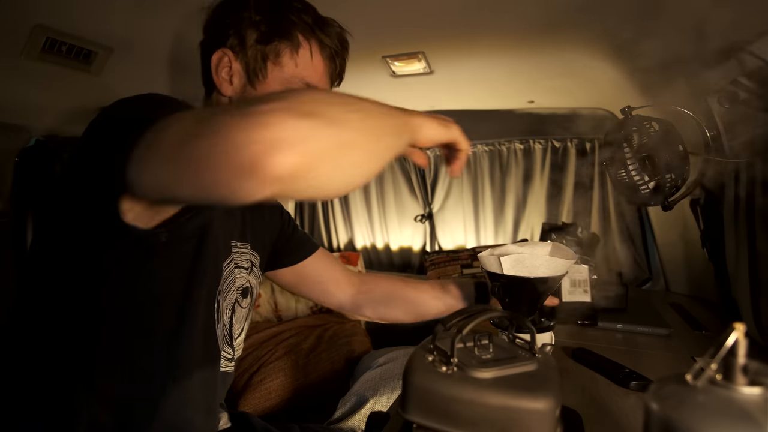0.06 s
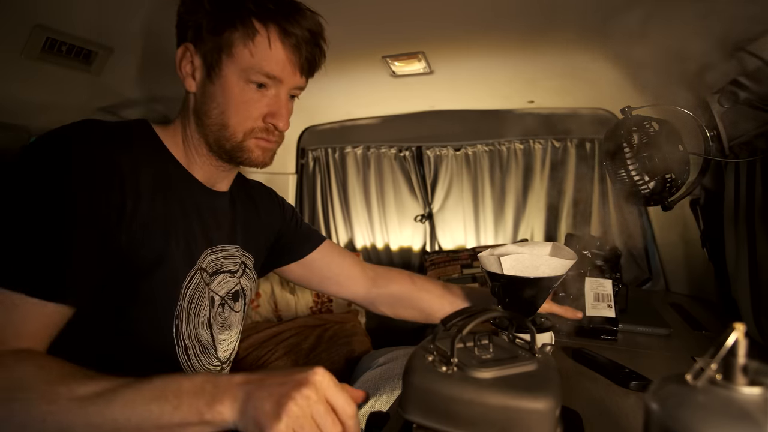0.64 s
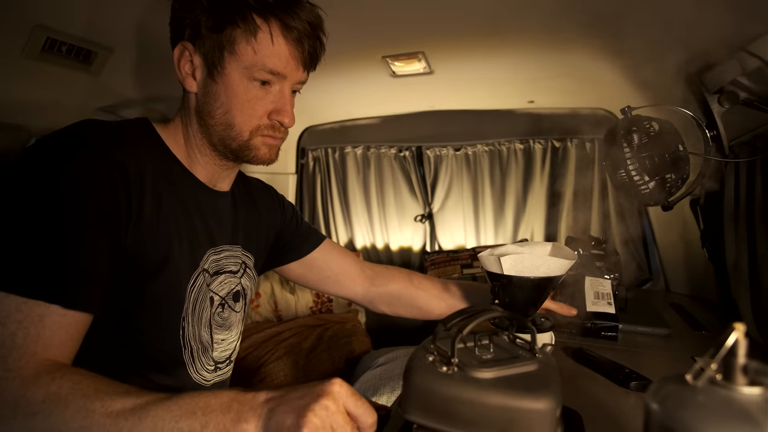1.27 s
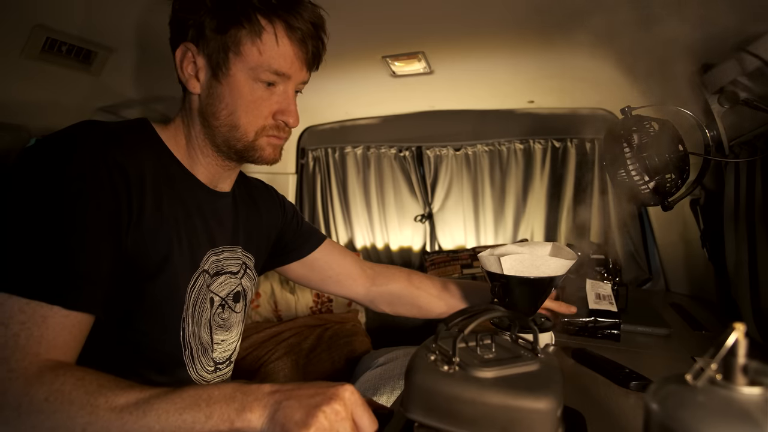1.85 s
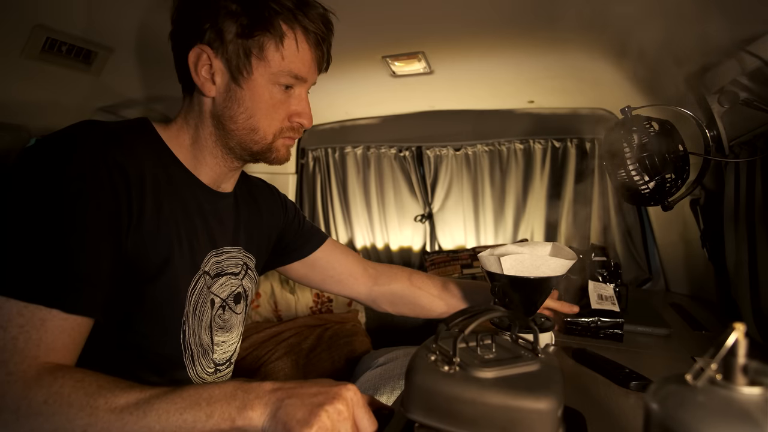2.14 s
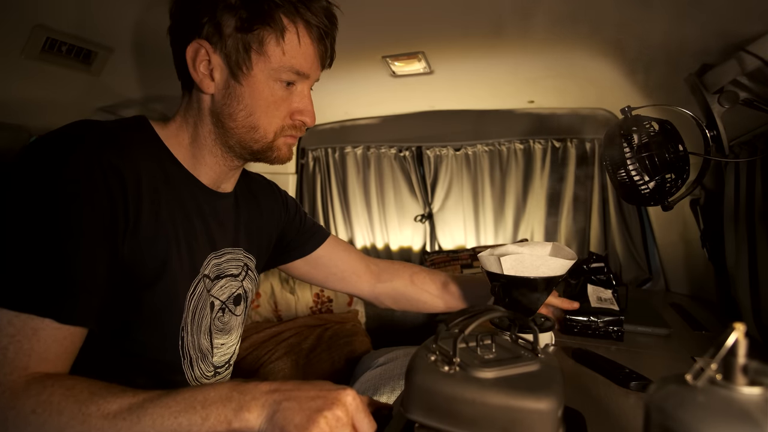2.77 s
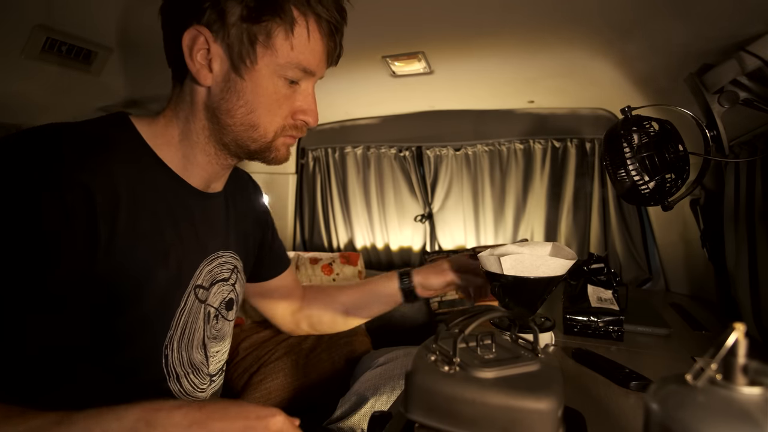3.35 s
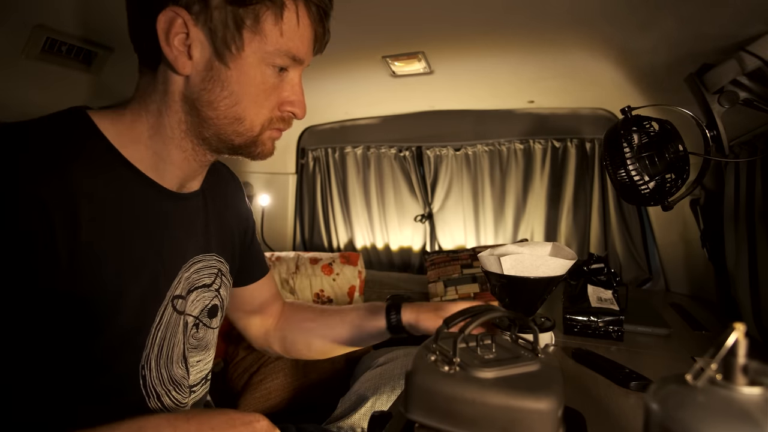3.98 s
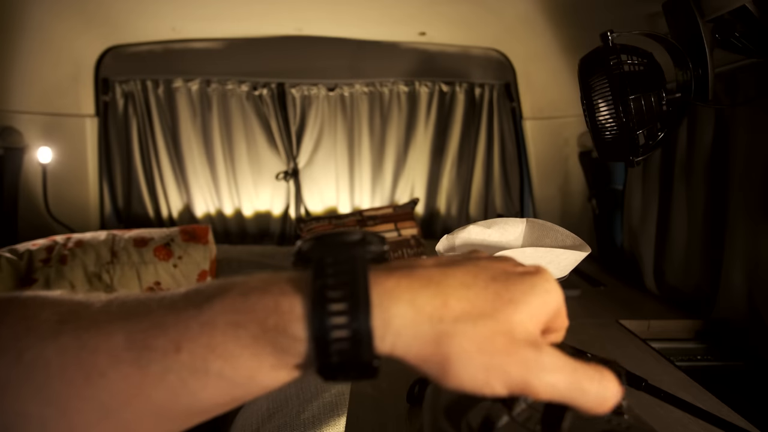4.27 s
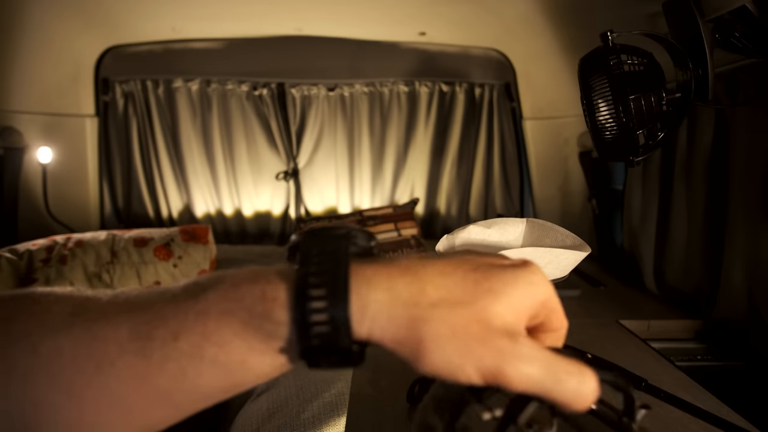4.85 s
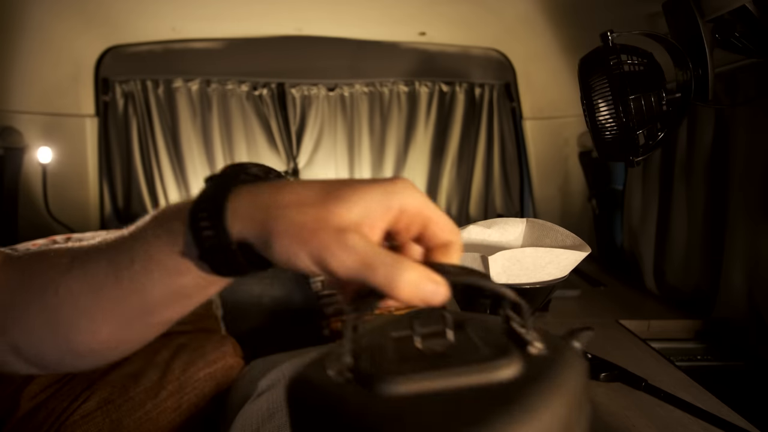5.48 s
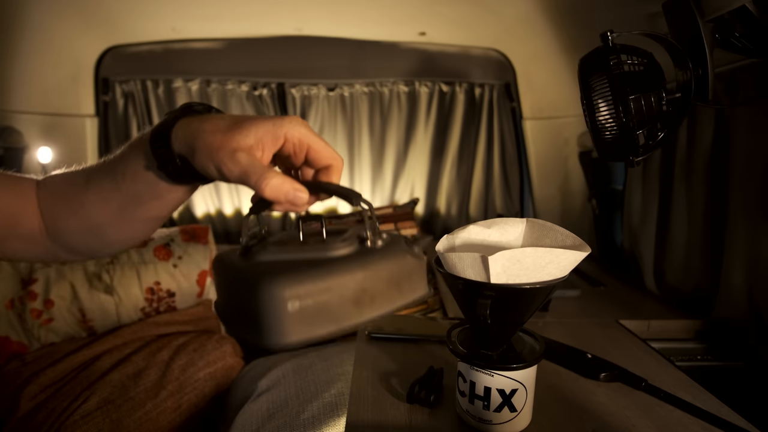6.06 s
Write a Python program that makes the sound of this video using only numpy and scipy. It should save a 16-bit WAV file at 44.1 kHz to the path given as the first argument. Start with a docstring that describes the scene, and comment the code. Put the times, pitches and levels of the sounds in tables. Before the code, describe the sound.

A small gas stove roars and fades, water spits on the hot kettle, and the kettle is dragged off with metallic scrapes.

```python
"""Kettle on a van's gas stove

Inside a quiet, padded van, one microphone close to the stove. The burner roars and is turned down.
Water on the hot kettle goes on spitting at two spots, each with a beat that slows as the metal cools.
A hand knocks the handle, drags the kettle off the pan support in four scrapes and lifts it.
Thin whistles, like a far bird, glide in faintly from outside."""
import sys
import numpy as np
from scipy import signal
from scipy.fft import rfft, irfft
from scipy.io import wavfile
from scipy.ndimage import uniform_filter1d

SR = 44100
rng = np.random.default_rng(int(sys.argv[2]) if len(sys.argv) > 2 else 0)


def generate_wav(signal):
    """Clip the signal to [-1, 1] and save it as 16-bit WAV at the path in sys.argv[1]."""
    frames = np.transpose(np.atleast_2d(signal))
    scaled = np.clip(frames, -1, 1) * 32767
    pcm = np.round(scaled).astype(np.int16)
    wavfile.write(sys.argv[1], SR, pcm)


N = 269892
HZ = np.fft.rfftfreq(N, 1 / SR)
TIME = np.arange(N) / SR

# room tone of the cabin: (frequency [Hz], relative level [dB])
AIR_COLOUR = [(15, -32), (25, 0.5), (59, 0), (149, -7), (363, -14), (416, -14), (796, -13), (1130, -15.5),
              (5280, -26.5), (8140, -39), (14800, -38.5), (16000, -38)]
# its loudness: (time [s], level [dB])
AIR_LEVEL = [(0, -63.5), (4.9, -56.5), (5.3, -63), (5.5, -63), (5.75, -59), (6.12, -58)]
# far whistles: (time [s], length [s], start [Hz], middle [Hz], end [Hz], level [dB])
WHISTLE_NOTES = [(0.481, 0.034, 3530, 3270, 3050, -43), (0.638, 0.11, 2500, 2780, 3390, -46),
                 (0.772, 0.069, 3340, 3170, 2480, -45), (1.789, 0.24, 6900, 7030, 7000, -63),
                 (3.05, 0.029, 3460, 3210, 3200, -47), (3.413, 0.065, 4750, 5320, 5600, -59),
                 (3.581, .04, 3260, 3000, 2800, -52), (3.779, 0.062, 5100, 4770, 4000, -57.5),
                 (4.048, 0.12, 6630, 6670, 6780, -58), (4.464, 0.073, 5500, 4900, 5470, -56),
                 (4.993, 0.13, 3810, 3980, 4350, -59.5), (5.276, 0.097, 5480, 5900, 5650, -62.5),
                 (5.49, 0.093, 5480, 4950, 4650, -65), (5.678, 0.13, 2200, 3310, 2390, -56.5),
                 (5.9, 0.096, 3100, 2605, 2210, -62.5), (6.065, 0.059, 3300, 3150, 2580, -51.5)]
# the burner being turned down: (time [s], roar [dB], jet hiss [dB], flame rumble [dB])
BURNER_LEVELS = [(0, -40, -45.5, -46), (.3, -42, -47, -47), (1.25, -42.5, -48.5, -46),
                 (1.45, -43, -47.5, -53.5), (1.6, -47, -52, -57.5), (1.85, -54.5, -63.5, -67),
                 (2.25, -79, -71, -90)]
# the burning gas: (frequency [Hz], relative level [dB])
FLAME_COLOUR = [(15, -35), (25, 1.5), (149, 7), (354, -0.5), (439, -16), (677, -6), (988, -18.5),
                (1160, -31.5), (1480, -14), (2110, -15.5), (2480, -16.5), (3080, -16.5), (3720, -35),
                (9070, -41.5), (16000, -57.5)]
# resonances of the gap under the kettle: (frequency [Hz], width [Hz], relative level [dB])
GAP_MODES = [(676, 12, 5), (906, 60, -3), (1160, 180, 3), (1665, 82, -14.5), (2068, 120, -3),
             (2945, 120, -3)]
# water on hot metal: (frequency [Hz], relative level [dB])
SIZZLE_COLOUR = [(240, -33.5), (400, -5.5), (742, -20), (814, -30), (1160, -4), (1290, -10.5), (1960, -5.5),
                 (2400, -9.5), (2750, -8), (9610, -12.5), (10400, -23.5), (12500, -13), (16000, -23.5)]
# the kettle's shell: (frequency [Hz], width [Hz], relative level [dB])
SHELL_MODES = [(590, 22, -1), (745, 30, -8), (1168, 34, 0), (1900, 70, -4), (2050, 70, -6), (2710, 90, -2),
               (2995, 70, -3), (3742, 40, -3), (4100, 42, -2), (4810, 55, -5), (5630, 50, -7),
               (7450, 200, -9), (8700, 100, -8), (9830, 150, -10), (12200, 90, -13), (12900, 300, -13)]
# beat of the full spits at the first spot: (time [s], rate [1/s])
FULL_SPIT_RATE = [(1.83, 23.35), (2.158, 21.66), (2.983, 12.39), (3.148, 12.07), (3.421, 9.71),
                  (3.841, 8.27), (4.2, 6.03)]
# beat of the thin spits at the second: (time [s], rate [1/s])
THIN_SPIT_RATE = [(2.545, 29.66), (3.079, 19.45), (3.774, 13.06), (4.17, 10.76)]
# how hard the kettle sputters: (time [s], fizz [dB], body [dB])
SPIT_LEVELS = [(1.8, -72, -55.5), (2.15, -46.5, -47), (2.4, -43.5, -43.5), (2.95, -41, -39.5),
               (3.6, -43, -39.5), (4.16, -45.5, -44)]
# dull bumps through the counter: (time [s], level [dB], nominal pitch [Hz], t60 [s])
COUNTER_BUMPS = [(0.02, -20, 187, 0.025), (0.452, -18.5, 233, 0.045), (0.468, -24.5, 73, 0.17),
                 (2.606, -42, 260, 0.035), (2.881, -48, 275, 0.15), (3.023, -26, 228, 0.027),
                 (3.721, -49.5, 64.9, 0.74), (4.071, -39.5, 81, 0.39), (4.969, -38, 58.5, 0.33)]
# knocks on handle and stove: (time [s], level [dB], treble [dB], t60 [s], ring against level [dB])
METAL_KNOCKS = [(0.022,-24.5,-56,0.023,-11), (0.411,-18,-30.5,0.024,-28), (0.453,-29.5,-34.5,0.045,-12),
                (0.699,-26,-47,0.033,-39), (1.311,-39.5,-60,0.023,-4), (2.611,-40.5,-56,0.031,-24),
                (3.023,-38,-41,0.025,-16), (3.619,-46.5,-75,0.14,3), (3.768,-30,-61,0.094,-3.5),
                (4.067,-23,-47,0.1,-4), (4.2955,-4,-20.5,0.027,-26), (4.381,-8,-27,0.07,-14),
                (4.653,-33,-53,0.17,7), (4.799,-28,-41,0.019,-12), (5.633,-41.5,-55.5,0.088,-19)]
# metal striking metal: (frequency [Hz], relative level [dB])
KNOCK_COLOUR = [(120, -43.5), (200, -12.5), (366, -6), (659, -7.5), (1500, 3.5), (2170, -3), (2420, -3),
                (3690, -12.5), (5230, -19), (6760, -23), (10500, -35.5), (14600, -47.5), (16000, -42)]
# ring of handle and lid: (frequency [Hz], relative level [dB], t60 [s])
HANDLE_MODES = [(700, 13.5, 0.071), (970, 2.5, 0.2), (1006, -9, 0.13), (1500, -6, 0.05), (1552, -3, 0.14),
                (2080, -26, 0.2), (2905, -9, 0.21), (2980, -25, 0.11), (3820, -36.5, 0.34)]
# the kettle sliding on the pan support: (frequency [Hz], relative level [dB])
GRIND_COLOUR = [(18, -46), (30, -9), (95, 1), (174, -31), (227, 1), (273, -15.5), (499, -11), (600, 9.5),
                (988, -2), (1460, 1), (3060, -15), (3310, -21), (3580, -33), (5590, -26), (16000, -49.5)]
# kettle and support ringing together: (frequency [Hz], width [Hz], relative level [dB])
SUPPORT_MODES = [(60, 19, -6.5), (90.3, 12, 0.5), (238.6, 4, -3.5), (632.8, 3.3, 13), (692, 17, 1),
                 (710, 10, 3), (792, 4.1, 1), (1142, 24, -3), (1260, 11, 2.5), (1475, 18, -5),
                 (1505, 20, 6.5), (1610, 43, -4), (1820, 16, -5), (1891, 77, 1), (2244, 95, -4),
                 (2750, 37, -5.5), (3070, 31, -12.5), (3674, 75, -20.5), (12000, 250, -38),
                 (13900, 250, -43.5)]
# the four scrapes: (time [s], hold [s], grind [dB], grit [dB], counter shake [dB], grind release [dB/s])
SCRAPE_STROKES = [(4.3, 0.11, -14.5, -35, -26.5, 234.5), (4.553, 0.054, -17.5, -40.5, -29, 613),
                  (4.698, 0.12, -25, -49, -35, 520), (4.886, 0.078, -22, -44.5, -43, 428)]

FLAME_DOWN_S, SIMMER_DB, SIMMER_DROP_DB, SIMMER_DROP_S, COOLING_DB_PER_S = 1.47, -51.5, 7.5, 0.33, 3
SPIT_RISE_S, FIZZ_S, BODY_S, SPIT_SCATTER_DB = 0.0035, 0.0077, 0.015, 1.3
REBOUND_S, REBOUND_DB = .021, -4.5  # a large drop touches the metal again
SHELL_HZ, SHELL_T60_S = 1170, .16
SHELL_RING_DB, THIN_BODY_DB = -11, -14  # against the body of a full spit
GRAB_DB_PER_S, SAG_DB_PER_S, JUDDER_DB, RASP_DB = 901.5, 30.5, 1.3, -20.5
SQUEAL_HZ, SQUEAL_DB = 5570, -50.5


def amp(db):
    """Decibels to gain."""
    return 10 ** (np.asarray(db) / 20)


def unit(x):
    """Scales to rms 1."""
    return x / np.sqrt(np.mean(x ** 2) + 1e-20)


def add(mix, s, sound):
    """Mixes a sound in at time s."""
    start = round(s * SR)
    sound = sound[max(-start, 0):]
    part = mix[max(start, 0):][:len(sound)]
    part += sound[:len(part)]


def noise(size=N):
    """White noise."""
    return rng.standard_normal(size)


def flicker(depth_db, per_s):
    """A gain that wavers at random."""
    return amp(depth_db * unit(uniform_filter1d(noise(), SR // per_s)))


def grains(per_s, spread_db):
    """Random tiny impacts, uneven in size."""
    impacts = noise() * (rng.random(N) < per_s / SR)
    return unit(impacts * amp(spread_db * np.minimum(rng.exponential(1, N), 4)))


def mode(t, hz, db, t60):
    """One dying resonance at a random phase."""
    return amp(db - 60 * t / t60) * np.sin(2 * np.pi * (hz * t + rng.random()))


def tone(hz, width_hz):
    """A fuzzy tone that follows the curve hz."""
    lowpass = signal.butter(2, width_hz / 2, fs=SR, output="sos")
    blur = signal.sosfilt(lowpass, noise(len(hz)) + 1j * noise(len(hz)))
    return unit((blur * np.exp(2j * np.pi * np.cumsum(hz) / SR)).real)


def response(colour, peaks=(), peaks_db=0):
    """Gain over frequency: a smooth slope with resonances standing on it."""
    hz, db = np.transpose(colour)
    power = amp(np.interp(np.log(HZ + 1), np.log(hz), db)) ** 2
    for centre, width, peak_db in peaks:
        power += amp(peak_db + peaks_db) ** 2 / (1 + (2 * (HZ - centre) / width) ** 2) ** 1.5
    return np.sqrt(power)


def band(x, gain, lo_hz, hi_hz):
    """One band of x at rms 1, coloured by a body that rings only after it is driven (minimum phase)."""
    edges = (1 + (lo_hz / (HZ + 1)) ** 12) * (1 + (HZ / hi_hz) ** 12)
    cepstrum = irfft(np.log(gain / np.sqrt(edges) + 1e-5), N)
    causal_filter = np.exp(rfft(2 * cepstrum[:N // 2], N))
    return unit(irfft(rfft(x) * causal_filter, N))


def level(s, db):
    """A level curve as gain, silent outside its span."""
    return amp(np.interp(TIME, s, db)) * (TIME >= s[0]) * (TIME < s[-1])


def van_echo(x, wet_db, t60):
    """Padded walls close around the microphone: a dense, very short echo above the bass."""
    t = TIME[:SR // 4]
    tail = noise(len(t)) * amp(-60 * t / t60) * (t > .002)
    tail = signal.sosfilt(signal.butter(2, 900, "high", fs=SR, output="sos"), tail)
    echo = signal.oaconvolve(x, tail / np.linalg.norm(tail))[:N]
    return (x + amp(wet_db) * echo) / np.sqrt(1 + amp(wet_db) ** 2)


def cabin_air():
    """Room tone: the low hush of still air in the van."""
    return band(noise(), response(AIR_COLOUR), 18, 17000) * level(*np.transpose(AIR_LEVEL))


def whistles():
    """Far off: thin gliding notes, blurred by their way in from outside."""
    out = np.zeros(N)
    for s, length, start_hz, middle_hz, end_hz, db in WHISTLE_NOTES:
        glide = np.polyfit([0, .5, 1], [start_hz, middle_hz, end_hz], 2)
        hz = np.polyval(glide, np.linspace(0, 1, int(length * SR)))
        note = tone(hz, width_hz=330 * (3000 / middle_hz) ** 1.5)  # higher notes are purer
        add(out, s, amp(db) * note * signal.windows.tukey(len(hz), .6))
    return van_echo(out, wet_db=-5, t60=.2)


def burner():
    """Turbulent flame rumble, roar under the kettle and jet hiss, all dying as the valve closes."""
    s, roar_db, jet_db, rumble_db = np.transpose(BURNER_LEVELS)
    colour = response(FLAME_COLOUR, GAP_MODES, peaks_db=-6)
    flutter = flicker(0.45, per_s=50)
    rumble = band(noise(), colour, 27, 310) * level(s, rumble_db)
    roar = band(noise(), colour, 386, 2730) * level(s, roar_db)
    jet = band(noise(), colour, 4330, SR / 2) * level(s, jet_db)
    # the shell sings as the flame drops
    sing = tone(np.full(N, 1168), width_hz=66) * level([1.2, 1.4, 1.52], [-58, -43, -58])
    return van_echo(rumble + flutter * (roar + jet), wet_db=-8, t60=0.062) + sing


def simmer():
    """Countless tiny spits merge into a sizzle that drops with the flame and fades as the kettle cools."""
    colour = response(SIZZLE_COLOUR, SHELL_MODES, peaks_db=-0.5)
    fizz = band(grains(per_s=9000, spread_db=2), colour, 1800, SR / 2)
    restless = unit(flicker(4, per_s=80))
    cooling_s = np.maximum(TIME - FLAME_DOWN_S, 0)
    drop_db = SIMMER_DROP_DB * np.minimum(cooling_s / SIMMER_DROP_S, 1)
    return fizz * restless * amp(SIMMER_DB - drop_db - COOLING_DB_PER_S * cooling_s)


def spit_beats(rate):
    """One spit for each turn of a spot's beat: (time [s], fizz [dB], body [dB])."""
    turns = np.cumsum(np.interp(TIME, *np.transpose(rate), left=0, right=0)) / SR
    times = TIME[1:][np.diff(np.round(turns)) > 0]
    s, fizz_db, body_db = np.transpose(SPIT_LEVELS)
    chance_db = SPIT_SCATTER_DB * noise(100)[:len(times)]
    return zip(times, np.interp(times, s, fizz_db) + chance_db, np.interp(times, s, body_db) + chance_db)


def spits():
    """Water flashes to steam: a sharp fizz and a slower body. Full spits rebound and ring the shell."""
    t = TIME[:SR // 8]
    fizz_power, body_power, ring = np.zeros((3, N))
    rise = 1 - np.exp(-t / SPIT_RISE_S)
    burst = rise * np.exp(-(t / FIZZ_S) ** 2)
    puff = rise ** 2 * np.exp(-(t / BODY_S) ** 2)
    for s, fizz_db, body_db in spit_beats(FULL_SPIT_RATE):
        add(fizz_power, s, (amp(fizz_db) * burst) ** 2)
        add(fizz_power, s + REBOUND_S, (amp(fizz_db + REBOUND_DB) * burst) ** 2)
        add(body_power, s, (amp(body_db) * puff) ** 2)
        add(ring, s, rise ** 2 * mode(t, SHELL_HZ, body_db + SHELL_RING_DB, SHELL_T60_S))
    for s, fizz_db, body_db in spit_beats(THIN_SPIT_RATE):
        add(fizz_power, s, (amp(fizz_db) * burst) ** 2)
        add(body_power, s, (amp(body_db + THIN_BODY_DB) * puff) ** 2)
    crackle = grains(per_s=27000, spread_db=2.6)
    body_colour = response(SIZZLE_COLOUR, SHELL_MODES, peaks_db=5.5)
    fizz_colour = response(SIZZLE_COLOUR, SHELL_MODES, peaks_db=4.5)
    body = band(crackle * np.sqrt(body_power), body_colour, 450, 4400) * np.sqrt(body_power.mean())
    fizz = band(crackle * np.sqrt(fizz_power), fizz_colour, 4660, SR / 2) * np.sqrt(fizz_power.mean())
    return van_echo(body + fizz, wet_db=-5, t60=0.11) + ring


def metal_rings():
    """A light touch rings the shell's lowest modes; the pan support rings on once the kettle leaves it."""
    t, out = TIME[:SR // 2], np.zeros(N)
    shell = sum(amp(db) * np.exp(-np.pi * width / 2 * t) * np.sin(2 * np.pi * hz * t)
                for hz, width, db in SHELL_MODES[:3])
    support = amp(-60 * t / .42) * np.sin(2 * np.pi * 900 * t)
    add(out, 2.875, amp(-39) * shell)
    add(out, 4.97, amp(-47) * support)
    return out


def bumps():
    """Soft blows shake the counter: a few damped low modes, scattered around each bump's pitch."""
    t, out = TIME[:SR // 2], np.zeros(N)
    attack = 1 - np.exp(-t / 0.0062)
    for s, db, hz, t60 in COUNTER_BUMPS:
        modes = sum(gain * np.sin(2 * np.pi * hz * ratio * rng.uniform(0.73, 1.3) * t)
                    for ratio, gain in [(.65, 0.94), (1, 0.8), (1.45, 0.95), (2.1, 0.55)])
        add(out, s, amp(db - 60 * t / t60) * modes * attack)
    return out


def knocks():
    """Close by: a brief clatter of metal contacts, followed by the ring of handle and lid."""
    t, out = TIME[:SR // 3], np.zeros(N)
    colour = response(KNOCK_COLOUR)
    clack = band(noise(), colour, 330, 4200)
    tick = band(noise(), colour, 5000, SR / 2)
    attack, onset = 1 - np.exp(-t / 0.00062), slice(SR // 100)
    for k, (s, db, treble_db, t60, ring_db) in enumerate(METAL_KNOCKS):
        part = slice(k * len(t), (k + 1) * len(t))  # fresh noise for each knock
        ring = sum(mode(t, *row) for row in HANDLE_MODES)
        ring *= amp(db + ring_db) / np.std(ring[onset])
        contact = amp(db) * clack[part] / np.std(clack[part][onset]) + amp(treble_db) * tick[part]
        settle = amp(-60 * (t / t60) ** 1.166)  # the parts chatter briefly before they rest
        add(out, s, (contact * settle + ring) * attack)
    return van_echo(out, wet_db=-12, t60=.15)


def strokes(levels_db, fall_scale=1, lag_s=0):
    """Gain of the scrapes over time: each grabs, sags while it holds, and lets go."""
    gain = np.zeros(N)
    for (s, hold, *_, release), db in zip(SCRAPE_STROKES, levels_db):
        t = TIME - s - lag_s
        grab_db = GRAB_DB_PER_S * np.minimum(t, 0)
        fall_db = SAG_DB_PER_S * np.clip(t, 0, hold) + release * np.maximum(t - hold, 0)
        gain = np.maximum(gain, amp(db + grab_db - fall_scale * fall_db))
    return gain


def scrapes():
    """Close by, the kettle sticks and slips: tiny impacts ring it and the support, and shake the counter."""
    _, _, grind_db, grit_db, shake_db, _ = np.transpose(SCRAPE_STROKES)
    pressure = strokes(grind_db)
    judder = flicker(JUDDER_DB, per_s=160)
    colour = response(GRIND_COLOUR, SUPPORT_MODES, peaks_db=6.5)
    slips = grains(per_s=8700, spread_db=0)
    grind = band(slips, colour, 400, 4300)
    grind /= np.sqrt(uniform_filter1d(grind ** 2, SR // 70) + 1e-6)  # the hand presses evenly
    grit = band(slips, colour, 4000, SR / 2) * strokes(grit_db, fall_scale=1.4)
    shake = band(slips, colour, 45, 400) * strokes(shake_db, fall_scale=0.45, lag_s=.008)
    rasp = band(slips, colour, 2600, 3700) * amp(RASP_DB) * pressure ** 0.98
    squeal = tone(np.full(N, SQUEAL_HZ), width_hz=43)
    squeal *= strokes([SQUEAL_DB] * len(SCRAPE_STROKES), fall_scale=0.98, lag_s=0.018)
    return judder * (grind * pressure + grit + rasp) + shake + squeal


def scene():
    """Everything reaches one microphone by the stove, the same on both channels."""
    mono = cabin_air() + burner() + simmer() + spits()
    mono += knocks() + metal_rings() + bumps() + scrapes() + whistles()
    return np.array([mono, mono])


def record(dry):
    """Each channel adds its own faint hiss; the top end stops at 15.9 kHz."""
    hiss = amp(-65.5) * np.array([noise(), noise()])
    lowpass = signal.firwin(511, 15900, window=("kaiser", 9), fs=SR)
    return signal.oaconvolve(dry + hiss, lowpass[None], "same")


dry = scene()
out = record(dry)
generate_wav(out)
```